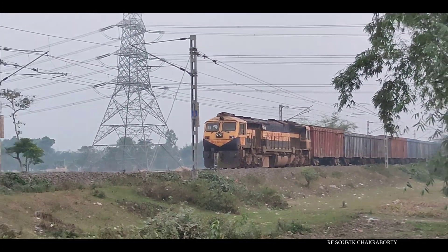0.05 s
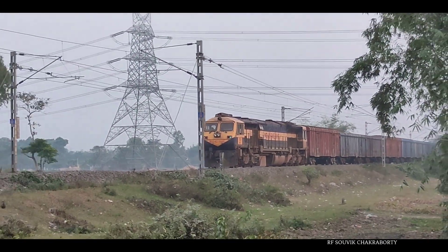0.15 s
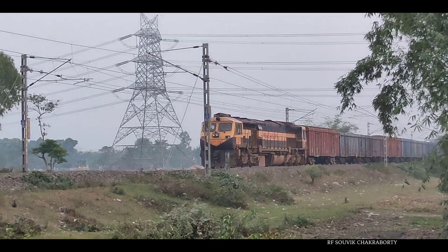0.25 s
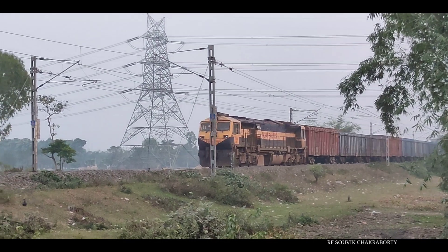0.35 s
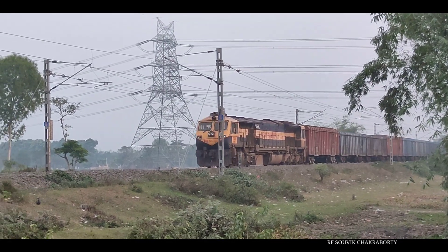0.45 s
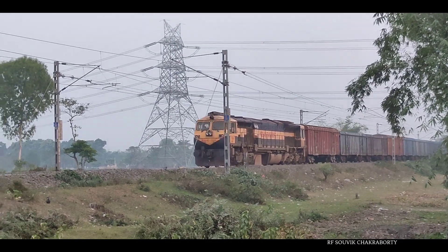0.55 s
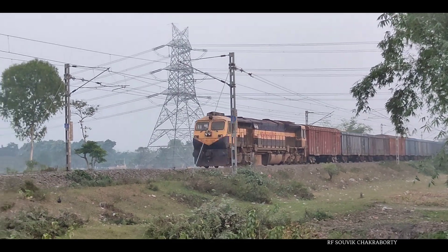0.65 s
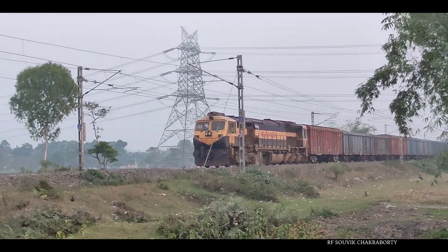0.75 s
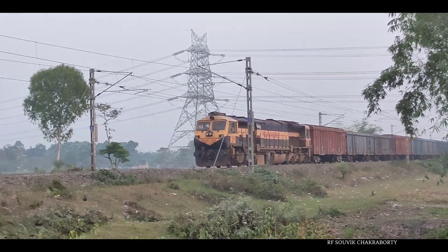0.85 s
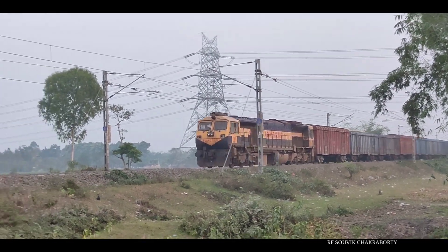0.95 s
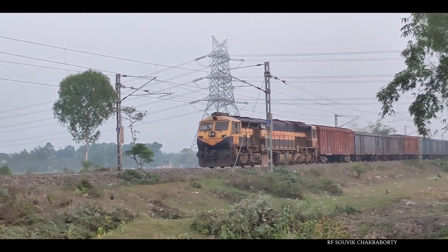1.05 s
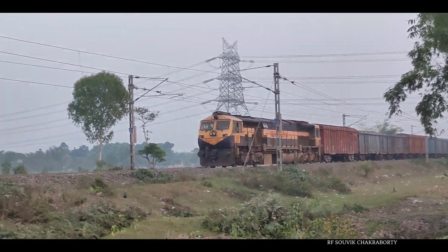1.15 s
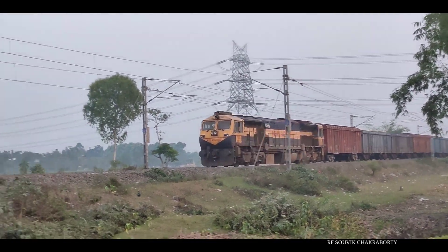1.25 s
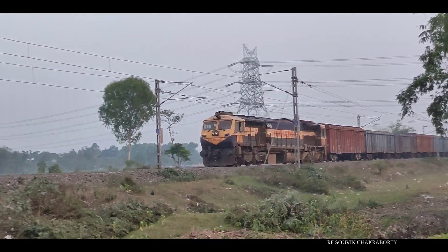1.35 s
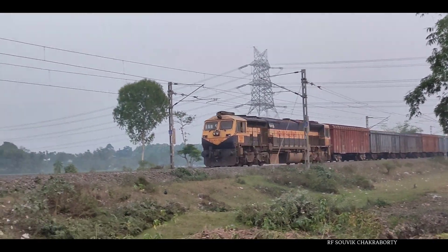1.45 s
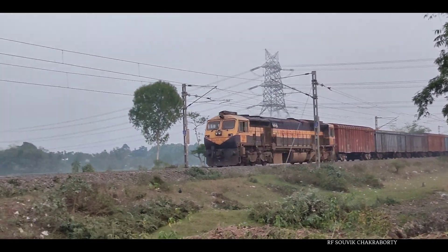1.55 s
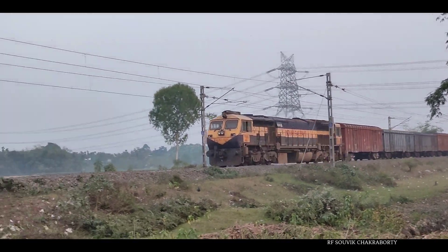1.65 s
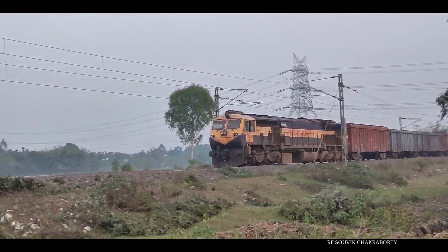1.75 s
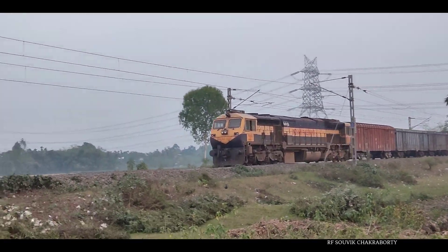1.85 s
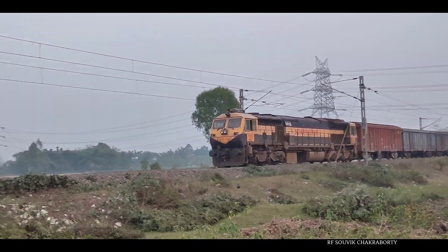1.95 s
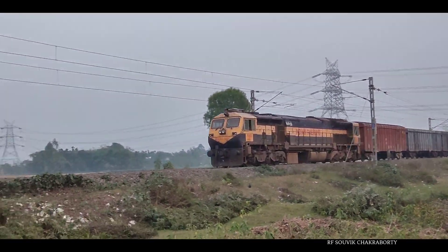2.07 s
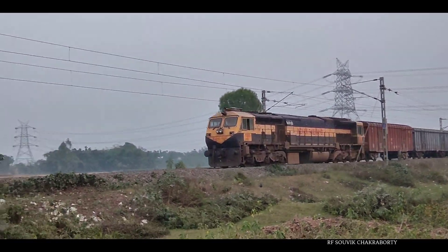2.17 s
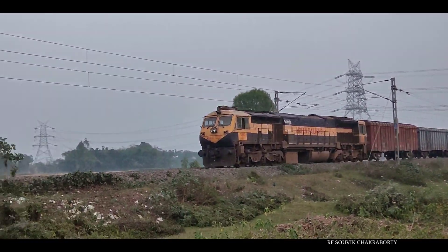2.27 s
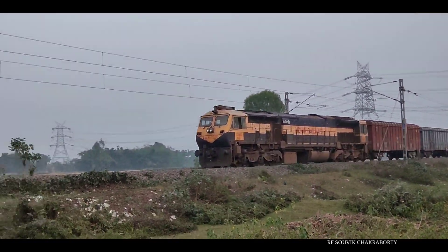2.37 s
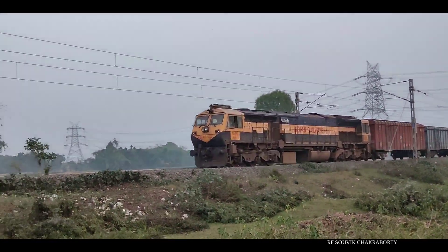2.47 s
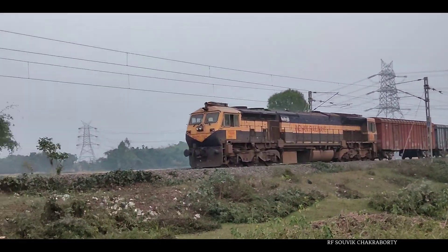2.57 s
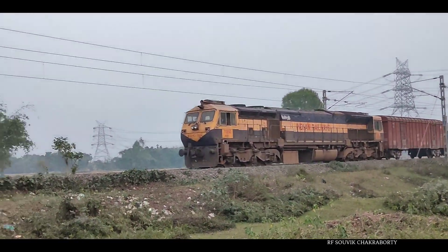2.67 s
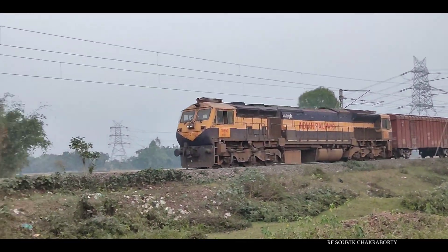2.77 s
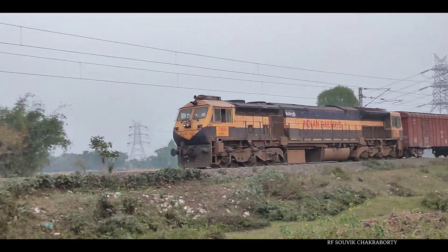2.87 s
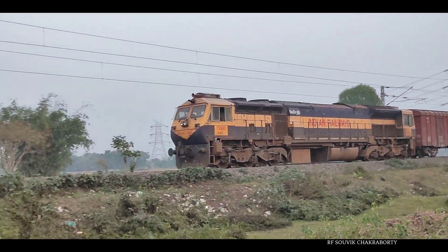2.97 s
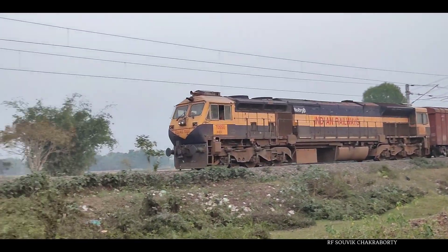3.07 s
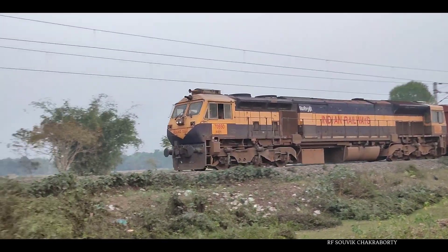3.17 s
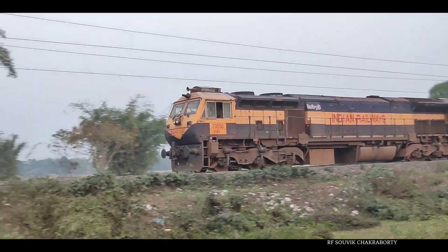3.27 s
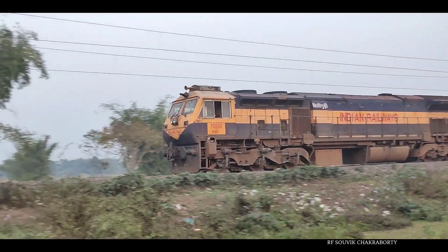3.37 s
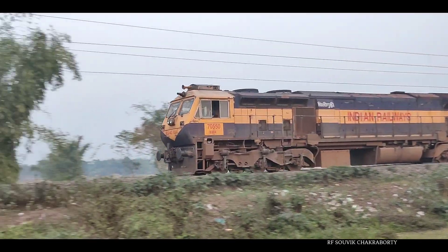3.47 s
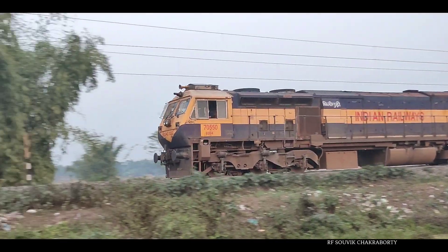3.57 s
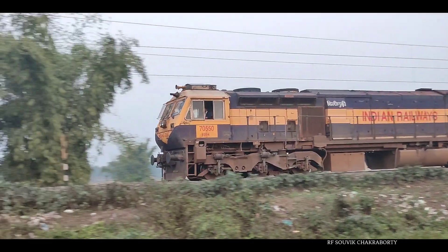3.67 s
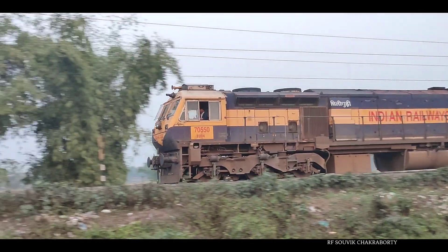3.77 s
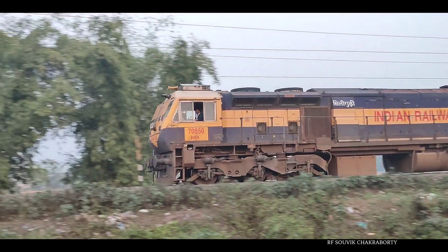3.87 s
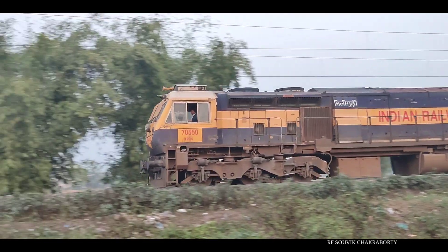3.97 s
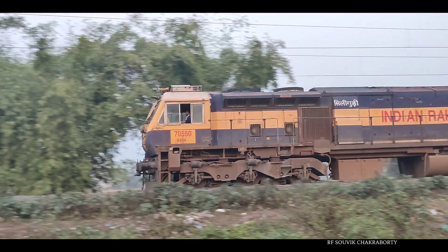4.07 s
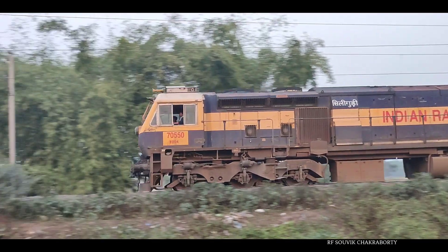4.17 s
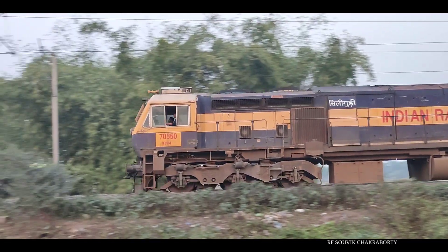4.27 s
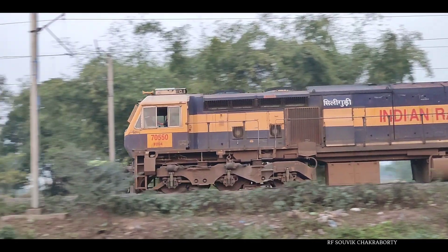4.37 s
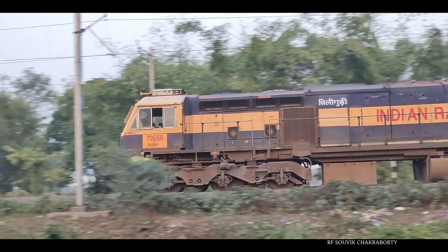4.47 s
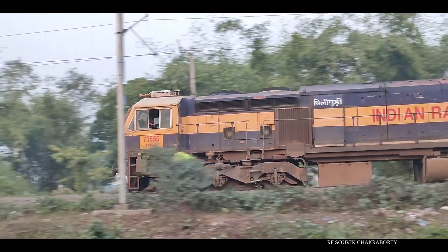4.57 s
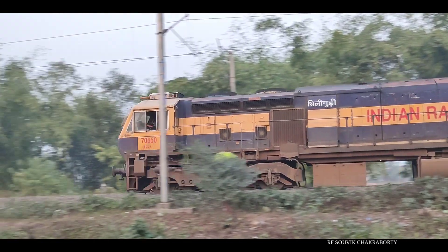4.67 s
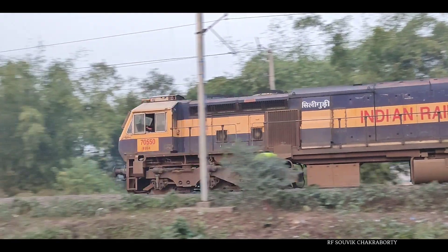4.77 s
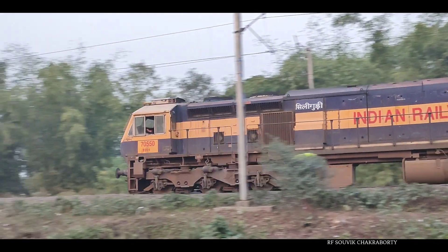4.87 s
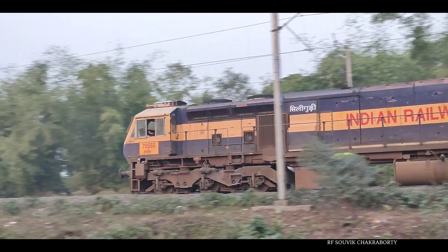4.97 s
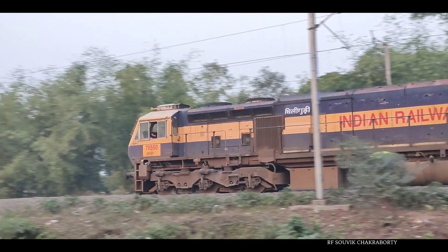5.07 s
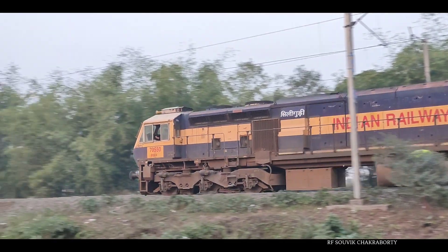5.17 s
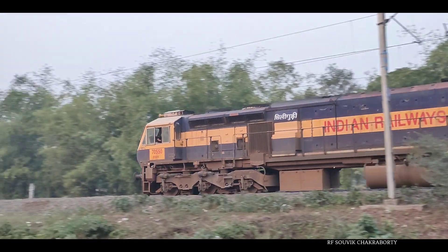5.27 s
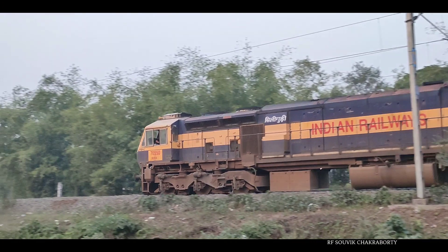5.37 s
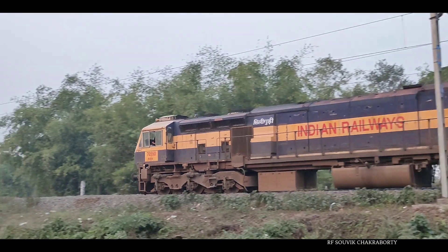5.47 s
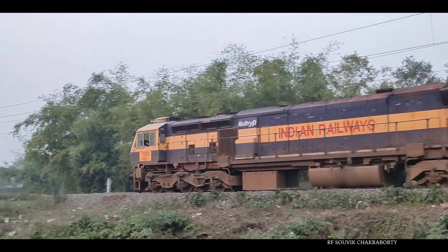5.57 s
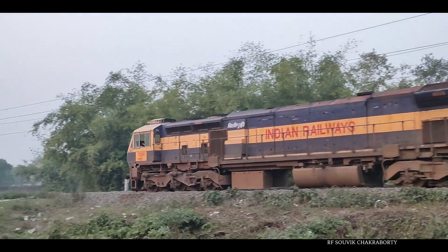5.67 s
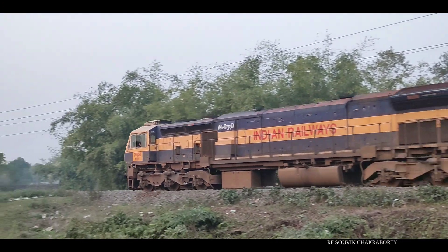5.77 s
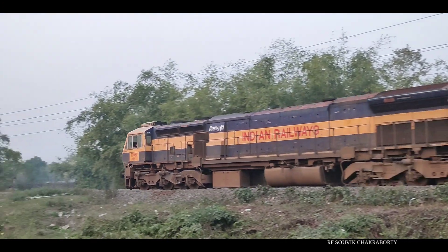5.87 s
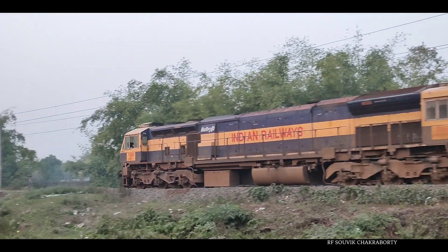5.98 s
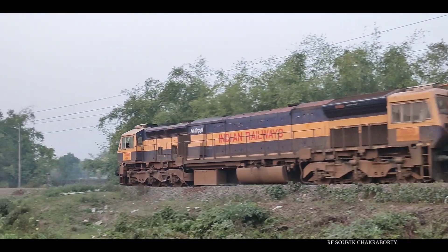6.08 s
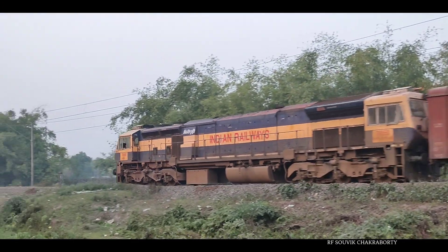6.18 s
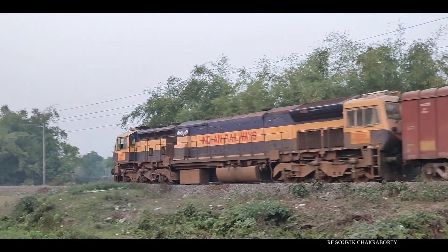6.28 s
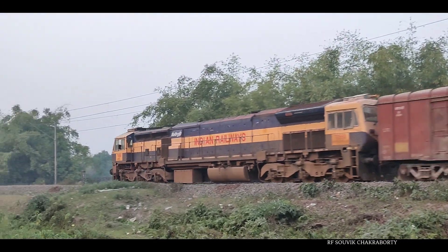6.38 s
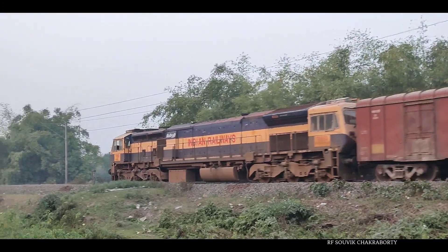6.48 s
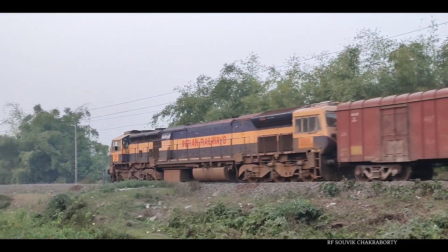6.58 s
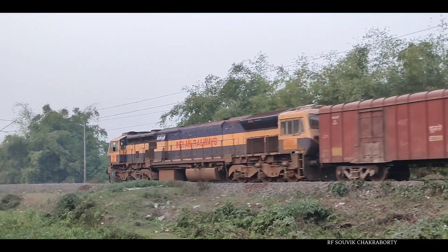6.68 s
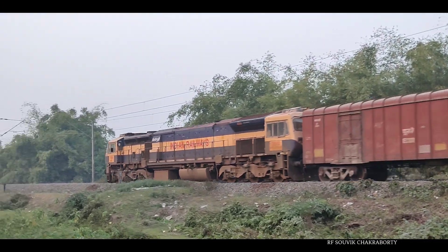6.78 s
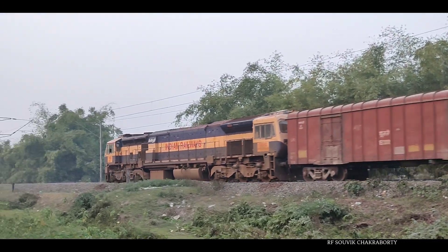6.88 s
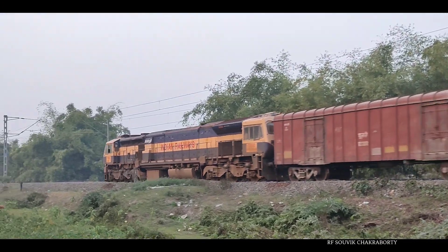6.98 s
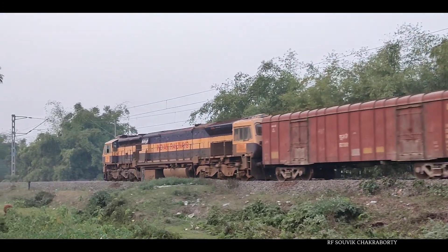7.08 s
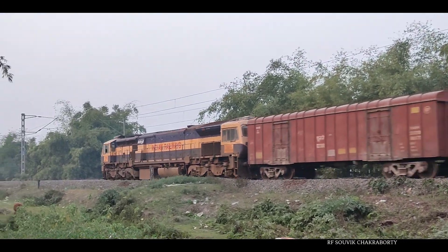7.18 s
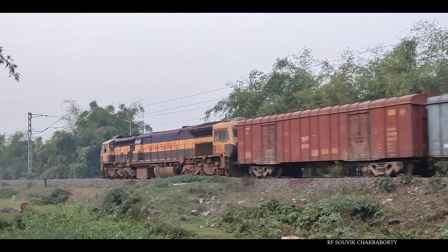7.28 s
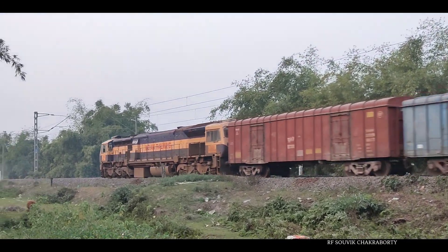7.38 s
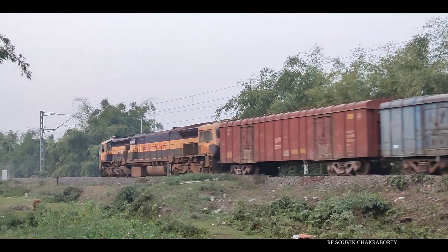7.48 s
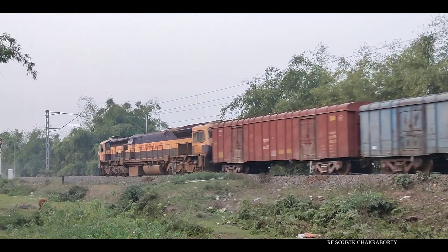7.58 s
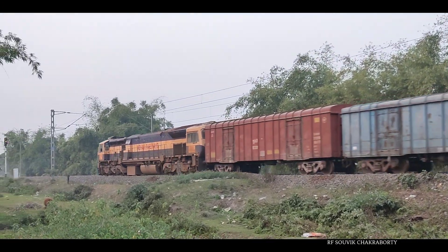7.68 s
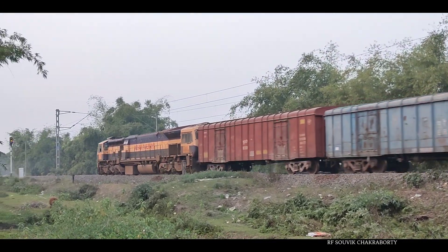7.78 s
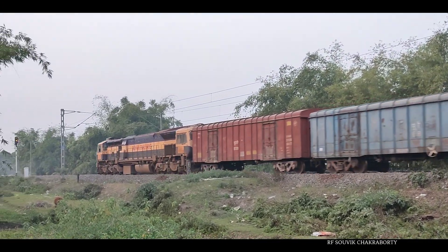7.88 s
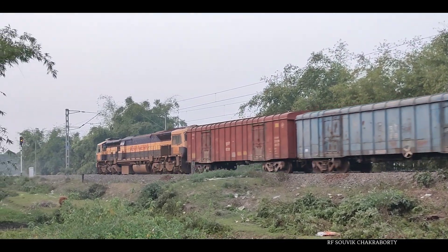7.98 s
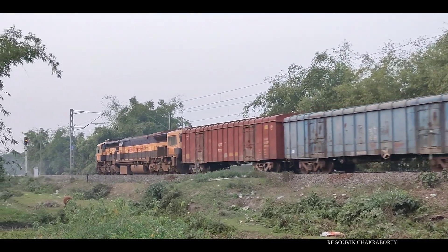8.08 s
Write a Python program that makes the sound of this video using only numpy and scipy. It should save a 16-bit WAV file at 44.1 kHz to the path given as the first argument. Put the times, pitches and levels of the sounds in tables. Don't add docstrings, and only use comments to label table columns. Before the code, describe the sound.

Open trackside air, handheld stereo phone. At 0 s a distant diesel throbs softly, a low uneven drone near 60-70 Hz, with thin intake hiss. A small chirp comes at 0.3 s, a sharp compressed-air blow-off at 0.4 s fades over about a second, and a high swooping bird call sounds at 0.9 s. From 1 to 3 s the engine spools up to a faster throb; hollow panels drum at 2.3-2.8 s and a blower whine near 1 kHz emerges. Wheel rumble, roar and hiss grow steadily. From 4.5 to 5.1 s the locomotive is abeam: loudest, bright steel hiss, turbo whistle, thick exhaust. Pitches slide down as it passes, with rushing hot air near 6 s and a squeak at 6.4 s. Wagons roll on, ringing briefly at 7.0 s and drooping at 7.4 s, with a last faint squeak near 7.95 s; the engine recedes, still throbbing, until the end at 8.1 s.

```python
import sys
import numpy as np
from scipy import signal
from scipy.io import wavfile
from scipy.ndimage import map_coordinates

SR = 44100
rng = np.random.default_rng(int(sys.argv[2]) if len(sys.argv) > 2 else 0)


def transcribe(signal):
    frames = np.atleast_2d(signal).T
    limited = np.clip(frames, -1, 1)
    pcm = np.round(limited * 32767).astype(np.int16)
    wavfile.write(sys.argv[1], SR, pcm)


def convert_level_to_amplitude(level_db):
    exponent = np.asarray(level_db, float) / 20
    return 10 ** exponent


N = 358753
HOP = 64
HOPS = np.arange(N) / HOP
HOP_S = np.arange(0, N, HOP) / SR
SPEED_M_S, SOUND_M_S = 18.837, 343
BLOWER_ABEAM_S, BLOWER_M = 4.647, 26.76
ENGINE_ABEAM_S, ENGINE_M = 5.0238, 23.291


def in_time(rows, step=1):
    s, *columns = np.transpose(rows)
    return [np.interp(np.arange(0, N, step) / SR, s, c) for c in columns]


def at_hz(points, hz):
    point_hz, value = np.transpose(points)
    return np.interp(np.log(hz), np.log(point_hz), value)


def fine(coarse):
    return np.interp(HOPS, np.arange(len(coarse)), coarse)


def drift(rate_hz):
    r = np.exp(-2 * np.pi * HOP * rate_hz / SR)
    settle = 1000
    white = rng.standard_normal(N // HOP + 1 + settle)
    slow = signal.lfilter([1], [1, -2 * r, r * r], white)[settle:]
    return slow / slow.std()


def swells(rows):
    mid, half, db = np.transpose(rows)[:, :, None]
    away = (HOP_S - mid) / half
    bells_db = db - 12 * away ** 2
    return 10 * np.log10((convert_level_to_amplitude(bells_db) ** 2).sum(axis=0) + 1e-14)


def notes(rows):
    mid, half, hz, arch, db = np.transpose(rows)
    away = (HOP_S[:, None] - mid) / half
    pitch = hz - arch * np.minimum(away ** 2, 2)
    nearest = np.abs(away).argmin(axis=1)
    return pitch[np.arange(len(away)), nearest], swells(np.transpose([mid, half, db]))


# [t/s, 0 far - 1 near]
NEARNESS = [(0, 0.064), (1.5, 0.2), (3, 0.49), (4.5, 0.78), (6.5, 0.74), (8.135, 0.81)]


def nearness():
    return in_time(NEARNESS, HOP)[0]


def ahead(abeam_s, side_m):
    along = SPEED_M_S * (abeam_s - HOP_S)
    distance = np.hypot(along, side_m)
    return along / distance, distance / side_m


def doppler(abeam_s, side_m):
    return 1 / (1 - SPEED_M_S / SOUND_M_S * ahead(abeam_s, side_m)[0])


def crank():
    low, high = 7.38064, 9.68129
    rise = 1 / (1 + np.exp((1.83004 - HOP_S) / .76988))
    return (low + (high - low) * rise) * doppler(ENGINE_ABEAM_S, ENGINE_M)


# [f/Hz, left minus right level/dB]
PORTS = [(60, 0), (400, .8), (1250, 1), (1820, .3), (2670, 5), (3900, 7), (5400, 7), (6200, 1), (6850, -5),
         (7300, -10), (7600, -11), (8100, -12)]


def ports(hz):
    tilt_db = at_hz(PORTS, hz) / 2
    return convert_level_to_amplitude(np.array([tilt_db, -tilt_db])).reshape(2, -1)


def whine(hz, level_db, width_hz, clean):
    phase = 2 * np.pi * np.cumsum(fine(hz)) / SR
    smear = np.sqrt(1 - clean ** 2)
    heard = []
    for gain in convert_level_to_amplitude(level_db) * ports(hz):
        in_phase = np.sqrt(2) * clean + smear * drift(width_hz)[:len(hz)]
        quarter = smear * drift(width_hz)[:len(hz)]
        heard.append(fine(gain * in_phase) * np.cos(phase) + fine(gain * quarter) * np.sin(phase))
    return np.array(heard)


# [t/s of middle, half length/s, f/Hz, arch/Hz, level/dB]
SMALL_NOTES = [
    (.28, 0.059, 3420, -2.5, -63),
    (.855, .12, 6260, 1900, -61),
    (1.08, 0.069, 5700, 498, -69),
    (6.36, .05, 6770, -2, -51),
    (7.95, 0.046, 6800, 5, -57),
]
# [t/s of middle, half length/s, f/Hz, arch/Hz, level/dB]
WAGON_RING = [
    (7.02, .035, 1260, -1.5, -41),
    (7.4, 0.24, 1266, 29.5, -44),
    (7.7, .15, 1214, 7, -54),
]
# [t/s of middle, half length/s, f/Hz, arch/Hz, level/dB]
BODY_RING_AND_DRONE = [
    (2.3, .4, 735, 0, -48.5),
    (2.76, .2, 715, 0, -42.5),
    (3.6, .75, 295.3, 0.0055, -44.5),
]


def small_sounds():
    clear = whine(*notes(SMALL_NOTES), 30, .8)
    return clear + whine(*notes(WAGON_RING), 30, .45) + whine(*notes(BODY_RING_AND_DRONE), 35, .1)


def valve():
    start_s, start_db, t60_s = .425, -38, 1.3
    since = np.arange(N) / SR - start_s
    jet_band = signal.butter(2, [3000, 7600], "band", fs=SR, output="sos")
    jet = signal.sosfilt(jet_band, rng.standard_normal((2, N)))
    return jet * (since > 0) * convert_level_to_amplitude(start_db - 60 * np.maximum(since, 0) / t60_s)


# [f/Hz, left-right likeness]
LIKENESS = [(60, 0.99), (110, 0.98), (210, 0.98), (380, 0.83), (710, 0.8), (1310, 0.39), (2420, 0.39),
            (4490, 0.55), (8320, 0.73)]


def noise(colours, low_hz, high_hz, per_octave, puff_db, own_db, sum_from_hz=0):
    count = round(per_octave * np.log2(high_hz / low_hz))
    edges = np.geomspace(low_hz, high_hz, count + 1)
    centres = np.sqrt(edges[1:] * edges[:-1])
    far_db, near_db = (at_hz(c, centres)[:, None] for c in colours)
    gains = convert_level_to_amplitude(far_db + nearness() * (near_db - far_db))
    counted_hz = np.diff(edges) * (centres > sum_from_hz)
    power = (gains ** 2 * counted_hz[:, None]).sum(axis=0) * 2 / SR
    white = rng.standard_normal((2, 2, N))
    puffs = drift(17) + .39 * drift(25)
    out = 0
    for k, hz in enumerate(centres):
        band = signal.butter(2, edges[k:k + 2], "band", fs=SR, output="sos")
        mid, side = signal.sosfilt(band, white[k % 2])
        alike = at_hz(LIKENESS, hz)
        pair = np.sqrt((1 + alike) / 2) * mid + np.sqrt((1 - alike) / 2) * side * [[1], [-1]]
        if hz > 1800:
            late = .45
            quarter = round(SR / hz / 4) * (-1) ** (k // 2)
            pair[1] = np.sqrt(1 - late ** 2) * pair[1] + late * np.roll(pair[0], quarter)
        waver = convert_level_to_amplitude(puff_db * puffs + own_db * drift(2.74))
        out = out + fine(gains[k] / np.sqrt(power) * waver) * pair * ports(hz)
    return out


# [t/s, level/dB]
ROLLING = [(0, -56.5), (.15, -58), (.36, -57), (.9, -53.5), (1.35, -51), (2.2, -45), (3.0, -42.5),
           (3.8, -40), (4.5, -35.5), (5.05, -35.5), (5.8, -36), (5.9, -34.5), (6.3, -36.5), (7.05, -38.5),
           (7.6, -39), (7.85, -40.5), (7.9, -38), (8.13, -41)]


def rolling_gain(abeam_db, share, wagons_db):
    passed = np.maximum(-ahead(ENGINE_ABEAM_S, ENGINE_M)[0], 0)
    swing_db = in_time(ROLLING, HOP)[0] + 34
    return convert_level_to_amplitude(fine(abeam_db + share * swing_db + wagons_db * passed))


# [f/Hz, level/dB per Hz]
RUMBLE = [
    [(20, -10.5), (33, -13), (45, 6), (60, -12), (110, 5.5), (150, -18), (230, -23), (350, -18.5)],
    [(20, -19.5), (33, -21), (45, -1), (60, -6), (110, -18.5), (160, -13), (270, -13.5), (350, -29)],
]


def rumble():
    return rolling_gain(-34, 1.03, 1.82) * noise(RUMBLE, 18.3, 350, 3, puff_db=-.86, own_db=1.6, sum_from_hz=110)


# [f/Hz, level/dB per Hz]
ROAR = [
    [(210, -43), (350, -16), (494, -3.5), (643, -2.5), (752, -3), (872, -16.5), (1040, -4.5), (1120, -12), (1240, -5.5), (1450, -15), (1810, -11.5), (2170, -27), (2500, -13), (3250, -49), (5500, -120)],
    [(210, -33), (350, -8), (399, -10), (459, -0.5), (515, -6.5), (687, 0), (740, -4.5), (872, -11), (1050, -7.5), (1500, -10.5), (1710, -9.5), (2400, -12.5), (2500, -12.5), (3250, -45), (5500, -120)],
]


def roar():
    return rolling_gain(-36, .74, .11) * noise(ROAR, 355, 2457, 6, puff_db=.75, own_db=1.2)


# [f/Hz, level/dB per Hz]
HISS = [
    [(2500, -16.5), (3400, -7), (4100, -5), (5100, -9), (6000, -13.5), (6800, -4.5), (7400, -13.5), (8100, -45.5)],
    [(2500, -4.5), (3300, -3), (4400, 0.5), (4850, 0), (5400, 3), (5950, 1.5), (6600, 0.5), (7200, 3.5), (7550, -15), (7850, -40), (8100, -22)],
]


def hiss():
    return rolling_gain(-32, 1.04, .28) * noise(HISS, 2500, 8100, 9, puff_db=.9, own_db=.45)


# [t/s of middle, half length/s, level/dB]
LOW_MESH = [(1.75, .3, -58), (2.5, .6, -57), (3.3, 0.34, -47), (3.8, 0.55, -43), (4.65, 0.37, -49.5),
            (5.5, 0.45, -47), (6.3, 0.71, -56), (7.1, .5, -57), (7.85, 0.66, -52)]
HIGH_MESH = [(.1, 0.83, -64.5), (2.4, 0.33, -54), (3.7, 0.61, -53), (4.6, .5, -49), (5.3, .3, -53),
             (6.0, 0.35, -57), (7.0, 0.48, -50), (7.9, 0.33, -51.5)]


def gears():
    low = whine(47.4 * crank(), swells(LOW_MESH) + 3, 5, .92)
    return low + whine(79.1 * crank(), swells(HIGH_MESH) + 4, 4, .9)


# [t/s, f/Hz, level/dB]
INTAKE = [(0, 7000, -57), (.25, 7220, -49), (.5, 7300, -51), (.85, 7310, -51), (1.07, 7400, -45),
          (1.3, 7500, -50), (1.8, 7750, -55), (2.05, 7810, -61), (2.4, 7850, -95)]
# [t/s of middle, half length/s, f/Hz, arch/Hz, level/dB]
HOT_AIR = [
    (.55, .25, 5200, 0, -58),
    (4.9, 1.0, 5460, 0.002, -47.5),
    (5.95, .6, 5250, 0, -42.5),
]


def air_rush():
    return whine(*in_time(INTAKE, HOP), 150, 0) + whine(*notes(HOT_AIR), 230, 0)


# [t/s of middle, half length/s, level/dB]
TURBO_AHEAD_SWELLS = [(.6, .1, -63), (.82, .08, -68), (1.15, 0.18, -60), (1.45, .3, -65), (1.85, .4, -61.5),
                      (3.0, .15, -63.5), (3.6, 0.48, -67.5)]
TURBO_ABEAM_SWELLS = [
    (2.3, 1.5, -77.5),
    (3.7, .4, -53.5),
    (4.3, .6, -51.5),
    (4.9, .5, -48.5),
    (5.5, .4, -56.5),
]


def turbos():
    front = whine(487 * crank(), swells(TURBO_AHEAD_SWELLS) + 7, 45, .5)
    full_hz, full_s, rise_hz_s = 5522, 3.9, 240
    run_up_hz = full_hz - rise_hz_s * np.maximum(full_s - HOP_S, 0)
    side_hz = run_up_hz * doppler(BLOWER_ABEAM_S, BLOWER_M)
    return front + whine(side_hz, swells(TURBO_ABEAM_SWELLS) + 7, 25, .85)


# [t/s of middle, half length/s, level/dB]
BLOWER_SWELLS = [(.4, 0.21, -50), (.8, 0.4, -53), (1.25, 0.23, -53.5), (1.85, 0.58, -52), (2.45, 0.2, -48),
                 (2.8, 0.3, -39.5), (3.7, 0.52, -43.5), (4.2, .25, -41), (4.6, 0.28, -39), (5.1, .5, -39),
                 (5.6, 0.22, -44), (6.0, 0.28, -43), (6.35, 0.35, -47.5), (7.0, .15, -59), (7.6, .3, -54),
                 (8.0, 0.34, -56.5)]


def blower():
    hz = 980.64 * doppler(BLOWER_ABEAM_S, BLOWER_M)
    level_db = swells(BLOWER_SWELLS)
    return whine(hz, level_db - 3.5, 5.2, .78) + whine(hz / 2, level_db - 17.5, 4.5, .61)


# [multiple of crank rate, level column, far share/dB, near share/dB, polarity]
ORDERS = [(4, 1, -10, -10, 1), (5, 1, -4, -2, -1), (6, 1, -6, -5, -1), (7, 2, -5, -6, 1), (8, 0, 0, 0, 1),
          (9, 2, -3, -3.5, 1), (10, 2, -9, -9, 1), (11, 2, -9, -7, -1), (12, 3, -22, -12, -1),
          (13, 3, 2, -18, 1), (14, 3, -24, -4, 1), (15, 3, -8, -15, 1), (16, 3, -26, -3, 1),
          (17, 3, -24, -5, 1), (18, 3, -26, -13, 1), (19, 3, -28, -14, 1)]
# [t/s, level/dB]
FIRING = [(0, -38.5), (.5, -35.5), (1.0, -36.5), (1.5, -31), (2.05, -32.8), (2.55, -28), (3.05, -28),
          (3.55, -26.5), (3.85, -25), (4.3, -36), (4.6, -25), (5.1, -30), (5.85, -24.5), (6.1, -27),
          (6.7, -26.5), (7.15, -28.5), (7.7, -33), (8.135, -34)]
# [t/s of middle, half length/s, level/dB]
LOW_ORDERS = [(0, 0.46, -45), (.8, 1.5, -57), (1.7, .5, -45), (2.6, 0.74, -47), (3.5, 0.82, -44),
              (4.85, 0.14, -32), (5.7, 1.5, -42.5), (7.6, 0.37, -37.5), (7.5, 1.5, -49.5)]
UPPER_ORDERS = [(0, 0.4, -47), (.8, 0.86, -44), (3.0, .8, -46), (4.6, 1.1, -33), (5.9, 0.53, -45),
                (7.2, 1, -46.5)]


def exhaust():
    start_turns, pipe_lag_cycles = .228, .28
    turn = np.cumsum(fine(crank())) / SR + start_turns
    spread_db = 20 * np.log10(ahead(ENGINE_ABEAM_S + .36, ENGINE_M)[1])
    neighbours_db = -31.5 - .83 * spread_db
    levels_db = [in_time(FIRING, HOP)[0], swells(LOW_ORDERS), neighbours_db, swells(UPPER_ORDERS)]
    near, out = nearness(), 0
    for order, column, far_db, near_db, polarity in ORDERS:
        loose = order != 8
        level_db = levels_db[column] + far_db + near * (near_db - far_db)
        waver_db = 1.2 * drift(1)[:len(near)]
        wander = fine(.03 * drift(1))
        wave = np.cos(2 * np.pi * (order * turn - pipe_lag_cycles + loose * wander))
        out = out + polarity * fine(convert_level_to_amplitude(level_db + loose * waver_db)) * wave
    return np.sqrt(2) * out


def scene():
    rolling = rumble() + roar() + hiss()
    machinery = gears() + air_rush() + turbos() + blower()
    return small_sounds() + valve() + rolling + machinery + exhaust()


def band_limit(x):
    return signal.sosfilt(signal.butter(12, 8920, fs=SR, output="sos"), x)


# [t/s, samples early]
LEFT_LAG = [(0, 0), (1.5, 1), (3, 2), (4.5, 4), (5.7, 3), (6.4, 0), (8.135, -3)]


def record(dry):
    lead, = in_time(LEFT_LAG)
    left = map_coordinates(dry[0], [np.arange(N) + lead], order=3, mode="nearest")
    heard = []
    for port, top_hz in ((left, 7910), (dry[1], 8000)):
        top = signal.ellip(12, .5, 70, top_hz, fs=SR, output="sos")
        heard.append(signal.sosfilt(top, port))
    return band_limit(np.array(heard))


dry = scene()
out = record(dry)
transcribe(out)
```